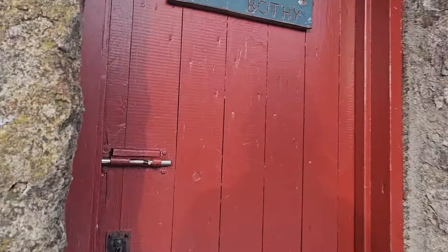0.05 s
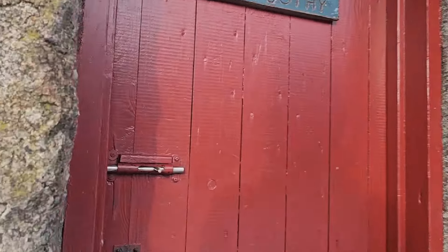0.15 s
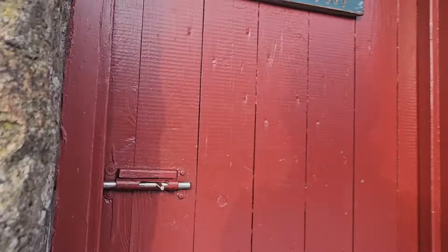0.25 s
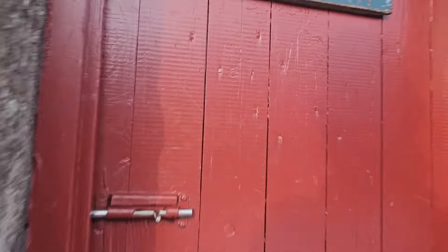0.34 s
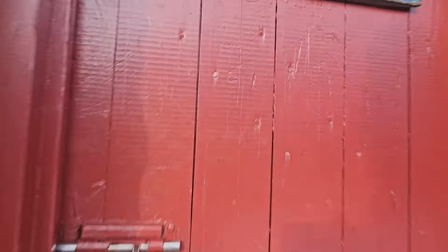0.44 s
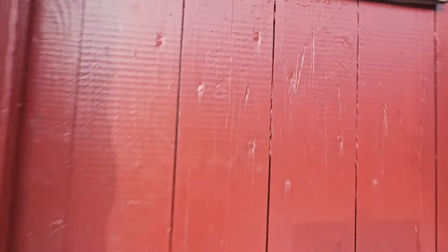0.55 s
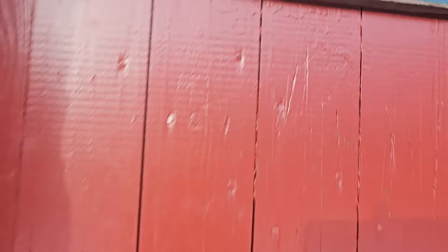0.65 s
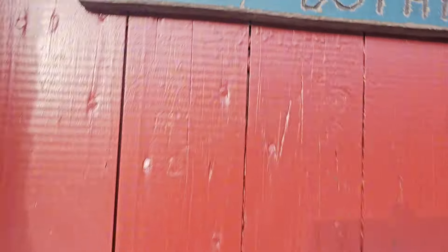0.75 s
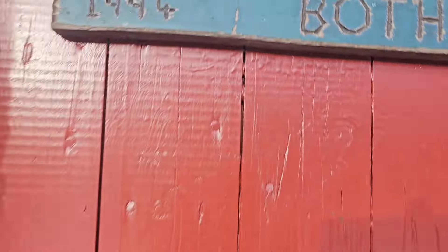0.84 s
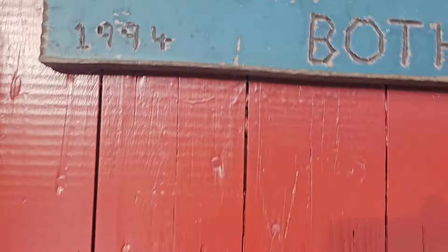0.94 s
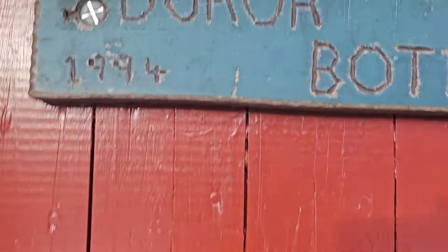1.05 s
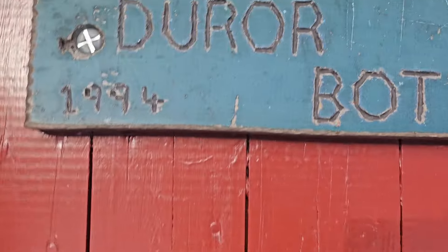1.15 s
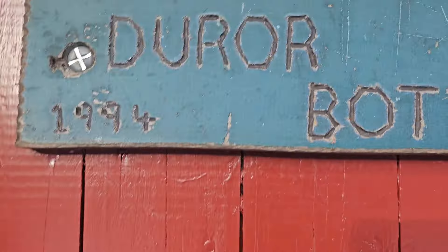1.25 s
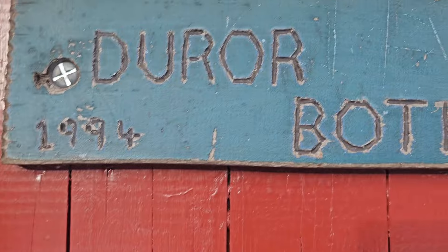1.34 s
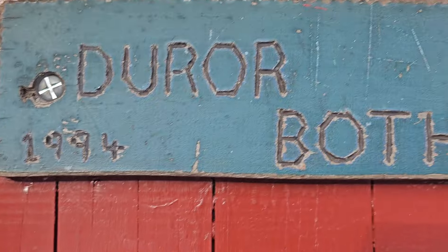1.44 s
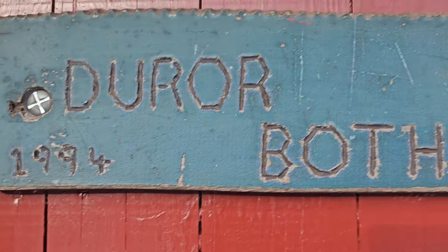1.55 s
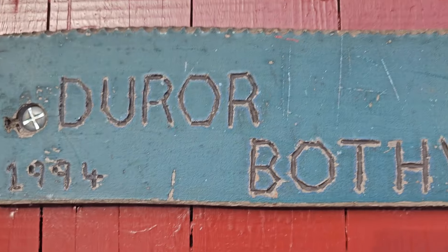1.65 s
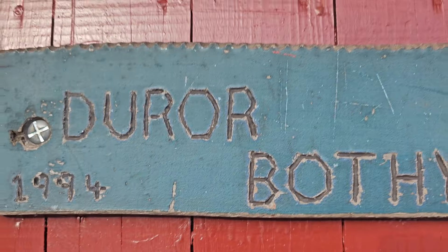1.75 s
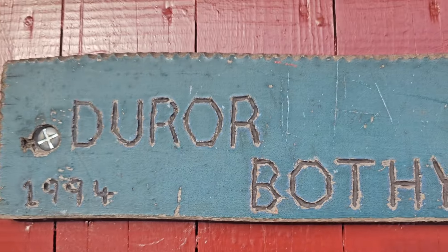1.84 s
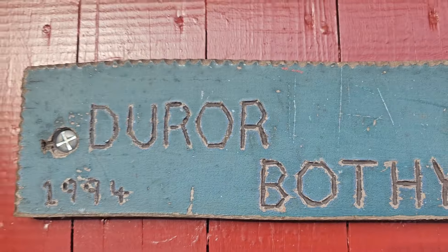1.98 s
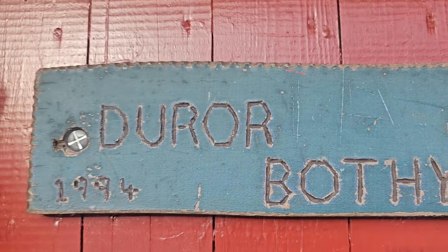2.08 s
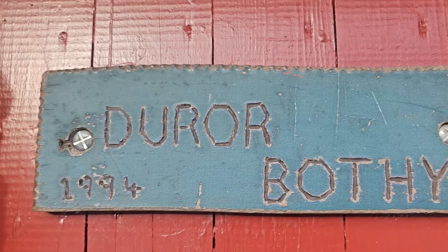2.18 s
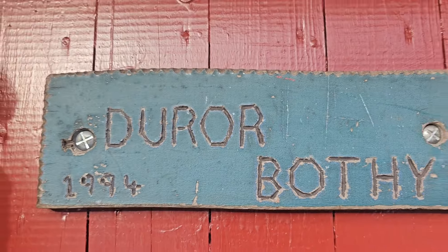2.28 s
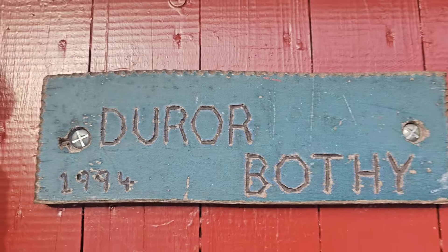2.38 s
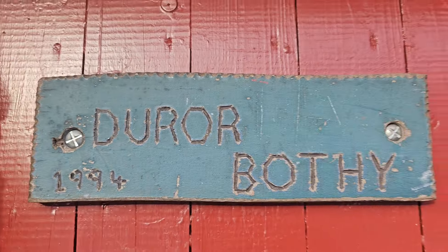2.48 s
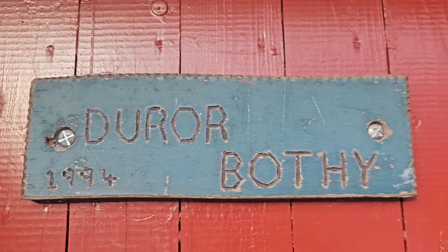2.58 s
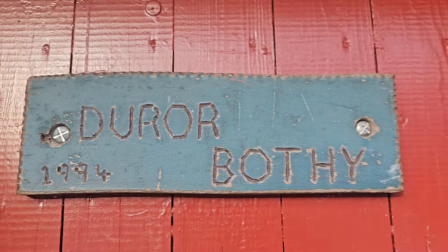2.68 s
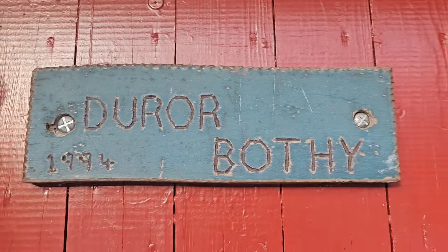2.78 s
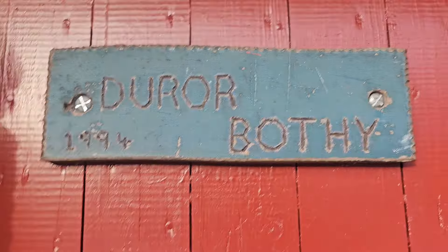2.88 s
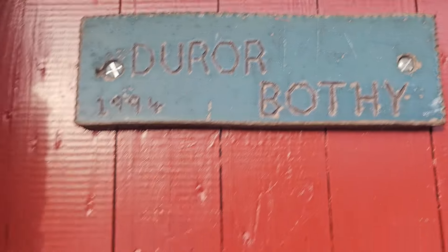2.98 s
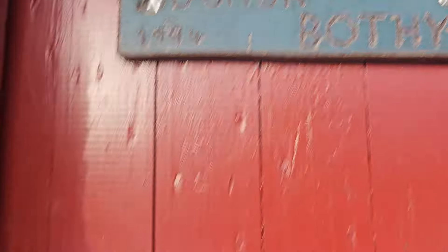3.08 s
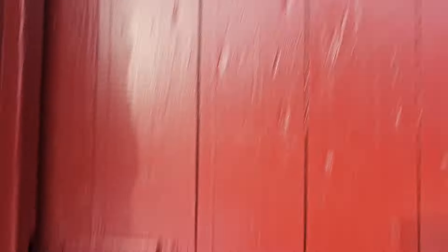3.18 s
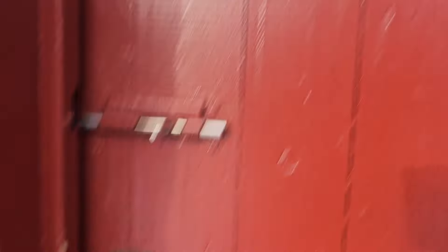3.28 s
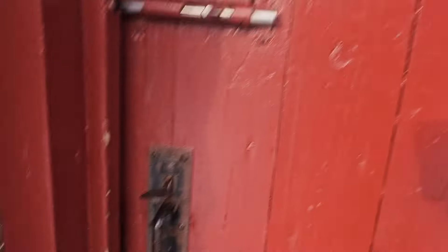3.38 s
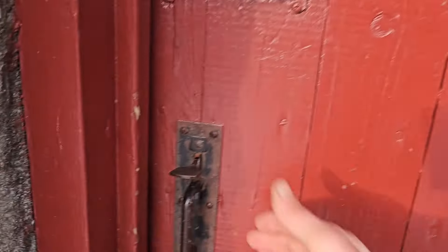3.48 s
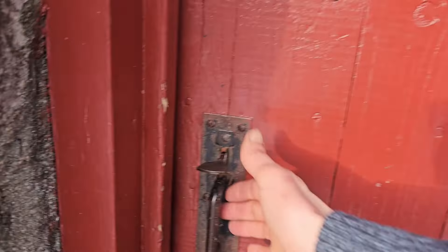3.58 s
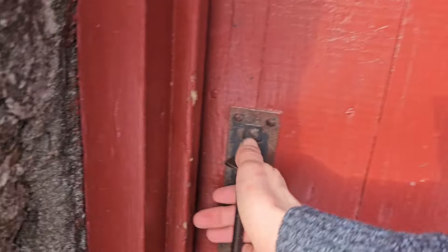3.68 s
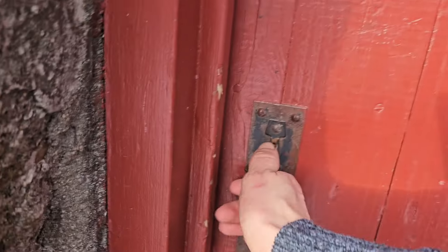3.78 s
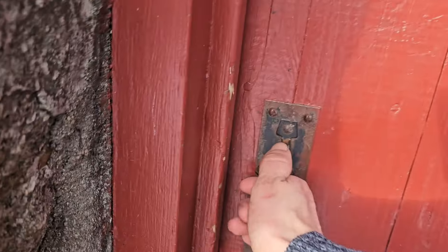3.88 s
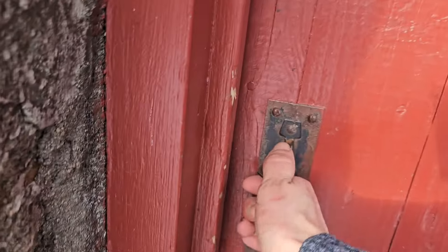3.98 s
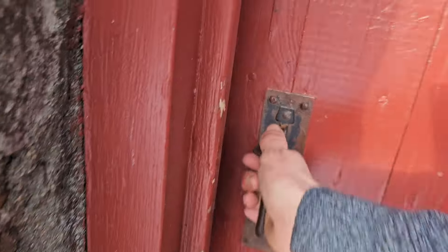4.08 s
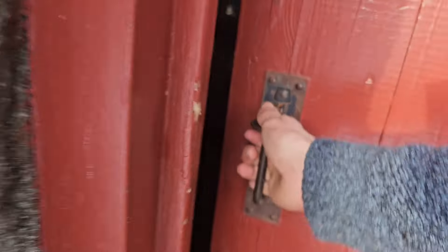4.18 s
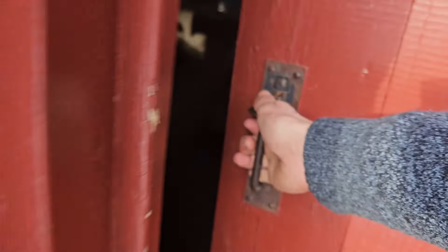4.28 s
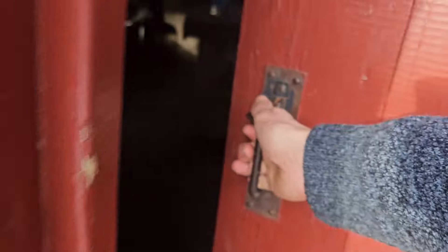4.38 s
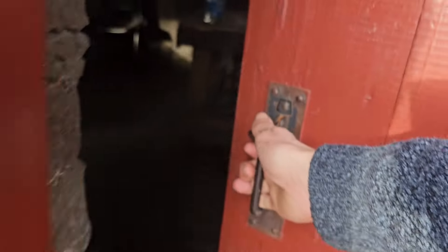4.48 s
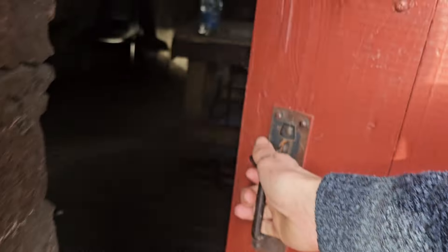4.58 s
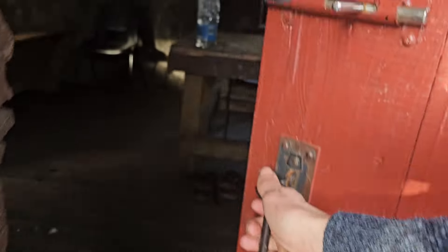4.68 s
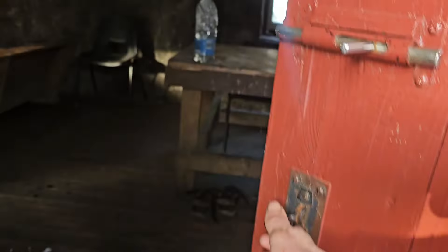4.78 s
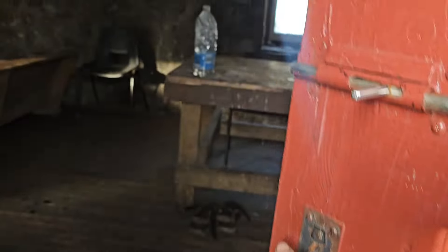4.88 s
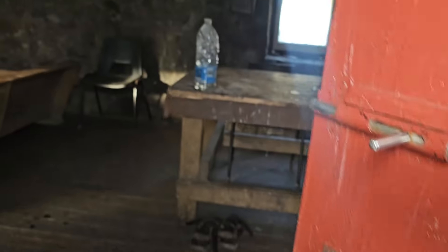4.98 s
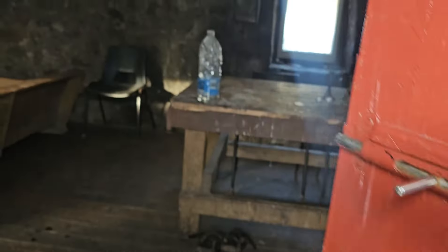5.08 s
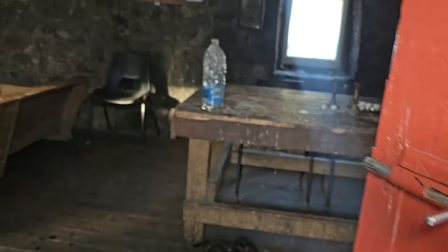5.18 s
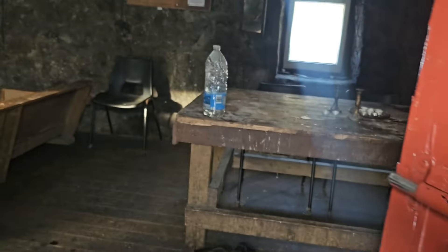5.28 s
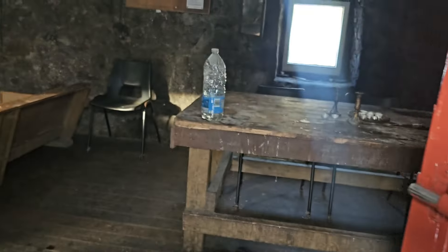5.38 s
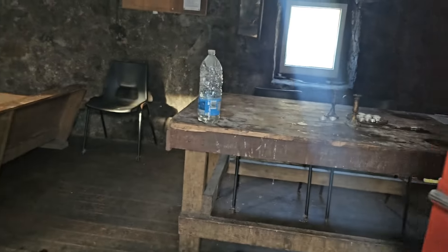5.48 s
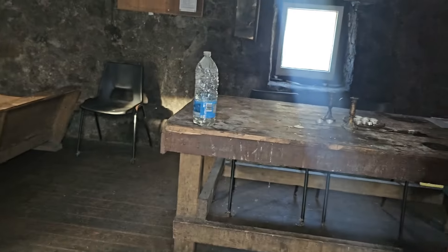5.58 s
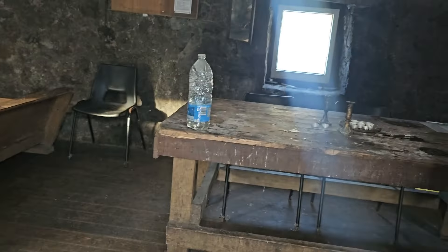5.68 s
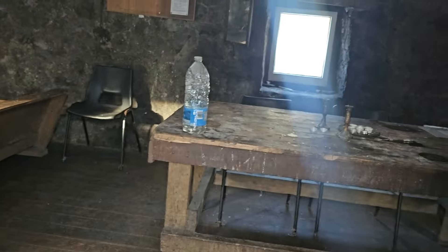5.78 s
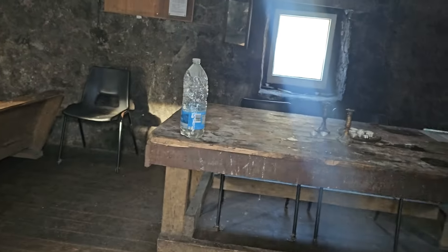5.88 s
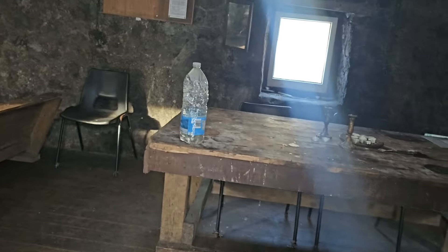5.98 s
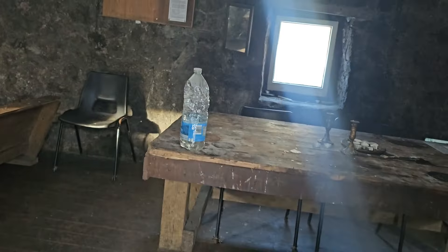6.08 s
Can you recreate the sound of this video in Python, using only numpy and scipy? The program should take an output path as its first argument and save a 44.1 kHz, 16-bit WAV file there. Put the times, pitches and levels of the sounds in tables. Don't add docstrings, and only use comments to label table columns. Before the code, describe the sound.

A thumb latch clatters sharply, a stuck wooden door pops free with faint hinge ticks, then a loose metal bolt knocks and rings indoors.

```python
import sys
import numpy as np
from scipy import signal
from scipy.fft import rfft, irfft
from scipy.io import wavfile
from scipy.ndimage import uniform_filter1d

SR = 44100
rng = np.random.default_rng(int(sys.argv[2]) if len(sys.argv) > 2 else 0)


def dump(signal):
    limited = np.clip(np.atleast_2d(signal).T, -1, 1)
    pcm = np.round(limited * 32767).astype(np.int16)
    wavfile.write(sys.argv[1], SR, pcm)


def voltage_ratio(decibels):
    exponent = np.asarray(decibels, float) / 20
    return 10 ** exponent


N = 270583

# (pitch [Hz], level [dB per Hz])
KEEPER = [(350, -45.5), (600, -15), (802, -5.5), (1250, -3.5), (1670, -18), (1870, -22.5), (3250, -14),
          (7660, -23.5), (14900, -43), (16400, -48)]


def evened(x):
    return x / np.sqrt(np.mean(x ** 2) + 1e-20)


def read(points, hz):
    f, value = np.transpose(points)
    return np.interp(np.log(hz + 1), np.log(f + 1), value)


def add(mix, s, sound):
    part = mix[:, round(max(s, 0) * SR):][:, :sound.shape[1]]
    part += sound[:, :part.shape[1]]


def ramp(start, end):
    return np.clip((np.arange(N) / SR - start) / (end - start), 0, 1)


def ring(modes, unlike):
    t = np.arange(SR // 3) / SR
    hz, db, t60 = np.transpose(modes)[:, :, None]
    start, shift = rng.uniform(-1.4, 1, (2, *hz.shape))
    turn = 2 * np.pi * hz * t + np.pi * start * min(unlike, 1)
    fade = voltage_ratio(db - 60 * t / t60)
    both = [(fade * np.sin(turn + side * unlike * shift)).sum(0) for side in (1, -1)]
    return np.array(both) * (1 - np.exp(-t / 0.000068)) / abs(both[0]).max()


def dense(colour, rise, t60):
    t = np.arange(4096) / SR
    a, b = rng.standard_normal((2, len(t)))
    z = rfft(np.array([a + 0.9 * b, a - 1.0 * b]))
    z = z * voltage_ratio(read(colour, np.fft.rfftfreq(len(t), 1 / SR)))
    return irfft(z) * (1 - np.exp(-t / rise)) * voltage_ratio(-60 * t / t60)


def ticks(rows, width, rise):
    out = np.zeros((2, N))
    for s, db, hz, t60 in rows:
        colour = [(hz / width ** 4, -35), (hz / width, -3), (hz * width, -3), (hz * width ** 3.5, -40)]
        puff = dense(colour, rise * t60, t60)
        add(out, s, voltage_ratio(db) * puff / abs(puff).max())
    return out


def noise(colour, patchy_db, flicker_db, size=1024):
    # (pitch [Hz], likeness [0 to 1])
    likeness = [(60, 1), (200, 0.98), (500, 0.91), (1500, 0), (5000, 0), (15000, 0.01)]
    # (pitch [Hz], left minus right [dB])
    left_tilt = [(60, 1.5), (500, 3), (1500, 2), (4000, -2.5), (15000, -2)]
    lag_s = 0.00035
    hop, hz = size // 4, np.fft.rfftfreq(size, 1 / SR)
    a, b, c, d, patches = rng.standard_normal((N // hop + 5, len(hz), 5)).T
    flicker = evened(uniform_filter1d(patches[0], size=3))
    patches = uniform_filter1d(patches, size=12, axis=0)
    patches = evened(uniform_filter1d(patches, size=10, axis=1))
    same = np.clip(read(likeness, hz), -1, 1)[:, None]
    left = a + 1j * b
    right = same * left * np.exp(2j * np.pi * hz * lag_s)[:, None]
    right = right + np.sqrt(1 - same ** 2) * (c + 1j * d)
    z = np.array([left, right * voltage_ratio(-read(left_tilt, hz))[:, None]])
    z *= voltage_ratio(read(colour, hz)[:, None] + patchy_db * patches + flicker_db * flicker)
    return evened(signal.istft(z, nperseg=size, noverlap=size - hop)[1][:, :N])


def hits(rows, iron_modes, plate, plate_db):
    # (pitch [Hz], level [dB], t60 [s])
    plank_modes = [(64, 0, 0.042), (86, -11.5, 0.058), (155, 0.5, 0.16), (202, -6.5, 0.24),
                   (270, 0.5, 0.18), (301.5, 3.5, 0.12), (330, -8, 0.031), (420, -8.5, 0.12),
                   (497, -1, 0.052), (550, -12, 0.015), (606, -9, .05)]
    crisp_s = 0.0025
    out, t = np.zeros((2, N)), np.arange(SR // 20) / SR
    iron, planks = ring(iron_modes, unlike=0.61), ring(plank_modes, unlike=0.15)
    for s, db, boom_db, chatter, pan_db in rows:
        rattle = 0.089 * np.exp(-t / chatter) * rng.standard_normal(len(t))
        crisp = min(crisp_s / chatter, 1)
        rattle[:3] += crisp
        soft = uniform_filter1d(rattle, size=24)
        near = signal.fftconvolve(rattle[None], iron, axes=1)
        thin = dense(plate, 0.00069, t60=9 * chatter)
        boom = signal.fftconvolve(soft[None], planks, axes=1)
        pan = voltage_ratio([[pan_db / 2], [-pan_db / 2]])
        for g, x in ((pan, near), (pan * crisp * voltage_ratio(plate_db), thin), (voltage_ratio(boom_db), boom)):
            add(out, s, voltage_ratio(db) * g * x / abs(x).max())
    return out


def latch_lift():
    # (time [s], blow [dB], plank boom [dB], chatter [s], left minus right [dB])
    lift = [(3.63, -50, -7.5, 0.0029, 3.5), (3.703, -23.5, -7, 0.024, 3), (3.715, -18, -6, 0.0072, 2),
            (3.752, -18.5, -4.5, 0.008, 6), (3.765, -1.5, -9, 0.0014, 1), (3.77, -6, -3.5, 0.0024, -2),
            (3.779, -11, -2.5, 0.003, 5.5), (3.786, -26.5, -2.5, 0.0034, 2)]
    # (pitch [Hz], level [dB], t60 [s])
    bar_up = [(800, -2, 0.038), (890, -6.5, 0.012), (1030, -4, 0.022), (1183, 4, 0.019), (1414, -2, 0.039),
              (1710, -3.5, 0.018), (1745, -7, 0.044), (1940, -8, 0.049), (2010, -2, 0.025),
              (2380, -4.5, 0.01), (2616, -11, 0.014), (3490, -17, .02)]
    return hits(lift, bar_up, KEEPER, plate_db=-5.5)


def lever_snaps():
    # (time [s], blow [dB], plank boom [dB], chatter [s], left minus right [dB])
    snaps = [(3.7225, -16, -8, 0.0016, -3), (3.729, -25, -10.5, 0.008, -1.5),
             (3.8115, -20.5, -15, 0.00079, -2), (3.843, -28, -10.5, 0.0048, 0),
             (3.849, -10.5, -15, 0.001, -4), (3.854, -21, -16, 0.00052, 0.5),
             (3.862, -37.5, -14.5, 0.0014, -1), (4.134, -25, -13.5, 0.011, -9),
             (4.1425, -19.5, 0.5, 0.0028, 2), (4.149, -31.5, -11, 0.0045, 1.5),
             (4.161, -32, 3.5, 0.0022, -1)]
    # (pitch [Hz], level [dB], t60 [s])
    lever = [(700, 2, 0.014), (1253, -3.5, 0.026), (1980, 1.5, 0.0084), (2500, 2.5, 0.013),
             (3350, -1.5, 0.014), (4060, -1.5, 0.016)]
    # (pitch [Hz], level [dB per Hz])
    lever_plate = [(590, -37.5), (1000, -11.5), (1470, -10.5), (3460, -2.5), (4690, -3.5), (5150, -9.5),
                   (6430, -6.5), (9690, -17.5), (10500, -19.5), (15300, -6.5), (16400, -19.5)]
    return hits(snaps, lever, lever_plate, plate_db=6.5)


def shove():
    # (time [s], level [dB], pitch [Hz])
    bend = [(4.127, -42, 823), (4.137, -21, 776), (4.14, -22, 430), (4.144, -15.5, 352), (4.152, -15, 296),
            (4.156, -32, 290), (4.163, -48, 285)]
    s, db, hz = np.transpose(bend)
    t, out = np.arange(s[0], s[-1], 1 / SR), np.zeros((2, N))
    # (delay [s], level [dB], pitch factor)
    for late, jerk_db, stretch in ((0, -1, 1), (.0023, -12, 1.5), (.0051, -11.5, .72), (.012, -20, 2.4)):
        phase = 2 * np.pi * np.cumsum(stretch * np.interp(t, s, hz)) / SR
        wave = voltage_ratio(np.interp(t, s, db) + jerk_db) * np.sin(phase)
        add(out, s[0] + late, np.array([wave, 0.46 * wave]))
    return out


def bar_drop():
    # (time [s], blow [dB], plank boom [dB], chatter [s], left minus right [dB])
    drop_blows = [(5.044, -28.5, -13, 0.0094, 4), (5.054, -25.5, -25.5, 0.0029, -10),
                  (5.059, -21.5, -11.5, 0.0055, 8.5), (5.07, -31.5, -15, 0.0069, -7),
                  (5.087, -27, -10, 0.012, 5), (5.095, -30, -17, 0.0051, -2),
                  (5.1065, -11, -14, 0.0017, 2.5), (5.111, -11.5, -14.5, 0.0066, -0.5),
                  (5.119, -20.5, -25.5, 0.0065, 7.5)]
    # (pitch [Hz], level [dB], t60 [s])
    bar_down = [(398, -6.5, 0.052), (599, -4, 0.051), (838, 0, 0.029), (855, -3.5, 0.055),
                (967, -2.5, 0.033), (1098, -2, 0.023), (1222, 5, 0.021), (1353, -5.5, 0.019),
                (1500, -13, 0.017), (1845, 0.5, 0.015), (2283, -1.5, 0.018)]
    # (time [s], level [dB], pitch [Hz], t60 [s])
    clacks = [(5.0445, -34, 3800, .03), (5.054, -28, 2200, .04), (5.087, -42, 4000, .04),
              (5.1062, -21, 2600, .04), (5.1065, -26, 5500, .025), (5.119, -34, 3000, .04)]
    return hits(drop_blows, bar_down, KEEPER, plate_db=-1) + ticks(clacks, 1.5, rise=.02)


def free_bar():
    # (pitch [Hz], level [dB], t60 [s])
    bar_ring = [(1870, 0, .08), (2330, -2, .08), (4030, -4, .08), (4510, -5, .08), (6590, -2, .2),
                (8160, -3, .22), (8700, -10, .08), (10200, -14, .03), (13500, -11, .17), (14700, -13, .15)]
    # (time [s], level [dB])
    free_blows = [(5.045, -46), (5.0545, -38), (5.088, -46), (5.107, -30), (5.113, -38)]
    out = np.zeros((2, N))
    for s, db in free_blows:
        add(out, s, voltage_ratio(db) * ring(bar_ring, unlike=0.79))
    return out


def hinge():
    # (time [s], level [dB])
    slips = [(4.543, -52), (4.609, -58), (4.647, -56), (4.657, -57), (4.682, -52), (4.699, -55),
             (4.714, -55), (4.742, -53), (4.759, -54), (4.778, -55), (4.792, -57), (4.803, -59),
             (4.818, -57), (4.836, -56.5), (4.861, -59), (4.875, -61)]
    pitch_hz, t60_s = 1700, 0.015
    return ticks([(s, db, pitch_hz, t60_s) for s, db in slips], 1.56, rise=0.028)


def small_knocks():
    # (time [s], level [dB], pitch [Hz], t60 [s])
    knocks = [(.539, -31, 380, .09), (.552, -44, 1300, .05), (.553, -50, 3200, 0.057),
              (.735, -46, 1100, 0.17), (.757, -40, 420, .04), (.966, -42, 1500, .05), (.975, -36, 600, .1),
              (1.0, -46, 4000, .07), (1.03, -56, 3200, .1), (1.2, -41, 1200, .025),
              (3.7035, -35.5, 3500, .06), (3.7155, -33.5, 3200, 0.033), (3.752, -33, 3600, .05),
              (3.7662, -9, 2100, .04), (3.768, -22.5, 4800, 0.028), (3.775, -22.5, 2800, 0.043),
              (3.772, -13, 270, .1), (4.128, -38, 1600, .05), (4.136, -30, 1200, .03),
              (4.258, -39, 650, 0.021), (4.265, -41, 800, 0.16), (4.27, -49, 1800, .12),
              (4.917, -45, 600, .03), (4.918, -48, 3500, 0.025), (4.928, -46, 900, 0.027),
              (4.965, -44.5, 150, 0.049)]
    # (time [s], level [dB], pitch [Hz], t60 [s])
    more_ticks = [(3.028, -39.5, 960, .093), (3.371, -44.5, 890, 0.029), (3.629, -46, 875, .046),
                  (3.929, -47, 7900, 0.018), (3.934, -39, 5810, 0.017), (4.01, -53, 6900, 0.035),
                  (4.02, -49, 12930, .03), (4.056, -33.5, 2300, .035), (4.056, -26.5, 1090, 0.033),
                  (4.108, -42, 13000, 0.072), (4.142, -11.5, 12300, .03), (4.2575, -28, 302, 0.026),
                  (4.55, -65, 2000, .03), (4.965, -63, 6000, .032), (5.044, -30.5, 3655, 0.035),
                  (5.054, -32, 3260, 0.046), (5.106, -46, 11000, 0.036), (4.82, -65, 2500, 0.035),
                  (4.917, -38, 1360, 0.027)]
    return ticks(knocks, 1.3, rise=0.041) + ticks(more_ticks, 1.46, rise=.04)


def scuffs():
    # (time [s], level [dB], pitch [Hz], t60 [s])
    scuff_rows = [(.05, -69, 3000, .1), (.18, -64, 5000, .11), (.22, -60, 3000, .05),
                  (.503, -64, 12250, .048), (.538, -49.5, 1500, 0.21), (.56, -51.5, 4000, .3),
                  (.664, -43.5, 7100, 0.021), (.71, -68, 4000, .04), (.72, -46, 595, 0.13),
                  (.755, -36.5, 380, 0.03), (.8, -48.5, 700, 0.1), (.895, -60, 4950, .02),
                  (1.112, -59, 6000, 0.014), (1.197, -40.5, 800, 0.063), (1.79, -67, 10000, .03),
                  (1.89, -62.5, 10000, 0.049), (2.115, -62, 2200, .03), (3.064, -55, 4840, .1),
                  (3.265, -53, 2650, .04), (3.968, -32, 374, 0.13), (3.969, -36, 2500, 0.094),
                  (3.977, -45, 14220, 0.044), (4.133, -19, 12000, 0.073), (4.258, -45.5, 4050, 0.15),
                  (4.15, -38, 776, 0.24)]
    # (time [s], level [dB], pitch [Hz], t60 [s])
    squeaks = [(.724, -52, 2090, .2), (.742, -62, 3760, 0.12)]
    return ticks(scuff_rows, 1.6, rise=0.1) + ticks(squeaks, 1.05, rise=0.065)


def steps():
    # (time [s], thud [dB], thud pitch [Hz], grit [dB], length [s])
    bumps = [(0.0, -41, 101, 6, 0.008), (0.095, -33.5, 227, -17, 0.0072), (0.219, -41, 209, -11, 0.016),
             (0.306, -37.5, 231, -19, 0.0091), (0.5415, -20, 128.5, -16, 0.0085),
             (0.971, -27, 125.4, 1.5, 0.0222), (0.988, -28.5, 436, 1.5, 0.0073),
             (0.996, -23.5, 140, -8, 0.0069), (1.197, -40.5, 233, -27, 0.0067), (1.74, -37, 165, -38, 0.03),
             (3.029, -28, 130, -20, 0.011), (3.37, -56, 103, -15, 0.013), (3.596, -45, 103, -15, 0.02),
             (3.766, -10, 157, -7, 0.017), (4.1615, -24, 230, -25, .005), (4.176, -29, 75, -25, 0.03),
             (4.216, -38, 180, -13, 0.025), (4.257, -27.5, 202, -14, 0.006),
             (4.651, -42, 233.4, -24, 0.013), (5.866, -45.5, 253, -16, 0.016)]
    # (pitch [Hz], level [dB per Hz])
    grit_colour = [(180, -59.5), (300, -10), (494, -3), (701, -19.5), (1320, -15), (1780, -27), (2790, -28),
                   (14000, -43.5), (16000, -42)]
    out, t = np.zeros((2, N)), np.arange(SR // 6) / SR
    grit = noise(grit_colour, patchy_db=0.5, flicker_db=-1.0, size=128)
    for k, (s, db, hz, grit_db, length) in enumerate(bumps):
        shape = (1 - np.exp(-t / 0.00087)) * np.exp(-(t / length) ** 1.1)
        thud = np.sin(2 * np.pi * hz * t) + 0.13 * np.sin(2 * np.pi * 2.2 * hz * t)
        crunch = voltage_ratio(grit_db) * grit[:, k * len(t):][:, :len(t)]
        add(out, s, voltage_ratio(db) * shape * (thud + crunch))
    return out


def movement():
    # (time [s], level [dB])
    effort = [(0.0, -7.5), (0.07, -11), (0.2, -10), (0.32, -20), (0.68, -11), (0.84, -16), (1.32, -26),
              (2.27, -35), (3.2, -21.5), (3.74, -16.5), (3.88, -2), (4.08, -6.5), (4.15, 0.5), (4.29, -5),
              (4.41, -22), (5.21, -15.5), (5.42, -35.5), (6.14, -24)]
    s, db = np.transpose(effort)
    return voltage_ratio(np.interp(np.arange(N) / SR, s, db))


def rubbing(moving):
    # (pitch [Hz], level [dB per Hz])
    rub_colour = [(240, -29), (400, 0), (628, -24), (756, -8), (1020, -19), (1190, 0.5), (1980, -14.5),
                  (7310, -23), (9970, -30), (11700, -20), (15700, -32), (16400, -42.5)]
    return voltage_ratio(-50) * moving * noise(rub_colour, patchy_db=.8, flicker_db=2.2, size=256)


def body_creak(moving):
    # (pitch [Hz], level [dB per Hz])
    body_colour = [(90, -39), (150, -1.5), (220, 0.5), (320, -4), (450, -17), (800, -48)]
    body = voltage_ratio(-49.5) * moving ** 0.97
    hollow = voltage_ratio(-63.5) * ramp(3.3, 3.4)
    return (body + hollow) * noise(body_colour, patchy_db=2.5, flicker_db=3.0)


def wind():
    # (middle [s], level [dB], half length [s])
    gusts = [(0.0, -43.5, 0.089), (.2, -46.5, 0.07), (.39, -43, 0.068), (.5, -42, .05), (.64, -44, 0.05),
             (.72, -62, 0.11), (.99, -51, 0.084), (1.48, -76, 0.087), (1.99, -52.5, 0.082),
             (3.04, -46, 0.038), (3.2, -42.5, 0.093), (3.33, -39, 0.064), (3.57, -51, 0.056),
             (3.82, -32, 0.071), (4.02, -41.5, 0.05), (4.17, -35, 0.045), (4.54, -51, 0.032),
             (5.12, -39.5, 0.091), (5.49, -53, 0.029), (6.05, -58, .08)]
    # (pitch [Hz], level [dB per Hz])
    gust_colour = [(12, -40), (20, -10), (43, -1), (67, 3.5), (95, -4.5), (179, -32.5), (307, -26),
                   (400, -26.5), (520, -63.5), (880, -120)]
    calm_db, edge_db = -65.5, 17.5
    t = np.arange(N) / SR
    power = voltage_ratio(2 * calm_db) + sum(voltage_ratio(2 * db - edge_db * ((t - s) / half) ** 2) for s, db, half in gusts)
    return np.sqrt(power) * noise(gust_colour, patchy_db=2.0, flicker_db=1.5, size=2048)


def distant_wash(moving):
    # (pitch [Hz], level [dB per Hz])
    wash_colour = [(35, -31), (60, -10.5), (105, 1.5), (169, -21), (218, -15.5), (283, -27), (333, -27),
                   (474, -11), (571, -16), (689, -15.5), (1000, -20), (1980, -28.5), (4950, -49),
                   (15300, -65), (16400, -66)]
    wash_db, stir_db, shelter_db = -56.5, 6, -3.5
    wash = voltage_ratio(wash_db + shelter_db * ramp(5.43, 5.63)) * (1 + voltage_ratio(stir_db) * moving)
    return wash * noise(wash_colour, patchy_db=1.5, flicker_db=-0.95)


def microphone_hiss():
    # (pitch [Hz], level [dB per Hz])
    hiss_colour = [(2350, -28), (4000, 0.5), (5280, -8), (7480, -5.5), (10700, -20), (11600, -11),
                   (12600, -16.5), (15200, -15.5), (16400, -22.5)]
    return voltage_ratio(-88.5) * noise(hiss_colour, patchy_db=-2.0, flicker_db=0.5)


def space(x, decays, gap):
    taps = np.zeros((2, SR))
    at = np.arange(0, SR - 20, 20) + rng.integers(0, 20, (2, SR // 20 - 1))
    np.put_along_axis(taps, at, rng.choice([-1., 1.], at.shape), 1)
    taps[:, :round(gap * SR)] = 0
    hz, t, z = signal.stft(taps, SR, nperseg=256)
    tail = signal.istft(z * voltage_ratio(-60 * t / read(decays, hz)[:, None]), SR, nperseg=256)[1]
    high_pass = signal.butter(2, 300, "high", fs=SR)
    tail[1] = tail[0] + signal.lfilter(*high_pass, tail[1] - tail[0])
    return signal.fftconvolve(x.mean(0)[None], tail / np.linalg.norm(tail[0]), axes=1)[:, :N]


def porch(x):
    # (pitch [Hz], t60 [s])
    porch_decays = [(100, 0.59), (1000, 0.15), (5000, 0.03), (16000, 0.02)]
    return space(x, porch_decays, gap=.004)


def room(x):
    # (pitch [Hz], t60 [s])
    room_decays = [(100, .8), (400, 0.4), (1100, 0.72), (1600, .6), (2300, .7), (7500, 0.64), (9500, 0.4),
                   (16000, 0.4)]
    turn = 2 * np.pi * 160 * np.arange(N) / SR
    feeds = [np.sqrt(2 / 3) * np.cos(turn / 2 + k * np.pi / 3) for k in range(3)]
    dull = signal.lfilter(*signal.butter(1, 8000, fs=SR), x)
    return sum(space(feed * dull, room_decays, gap=0.0079) for feed in feeds)


def scene():
    outside = latch_lift() + lever_snaps() + shove() + small_knocks() + scuffs()
    inside = bar_drop() + free_bar() + hinge()
    moving = movement()
    air = rubbing(moving) + body_creak(moving) + wind() + distant_wash(moving) + microphone_hiss()
    echoes = voltage_ratio(-20.0) * porch(outside) + voltage_ratio(-6.5) * room(inside)
    return outside + inside + echoes + steps() + air


def band_limit(x):
    return signal.sosfilt(signal.butter(12, 16670, fs=SR, output="sos"), x)


def record(dry):
    dry = signal.sosfilt(signal.butter(2, 36, "high", fs=SR, output="sos"), dry)
    dry = 1.1 * np.tanh(dry / 1.1)
    dry = signal.sosfiltfilt(signal.butter(24, 16250, fs=SR, output="sos"), dry)
    return band_limit(dry)


dry = scene()
out = record(dry)
dump(out)
```